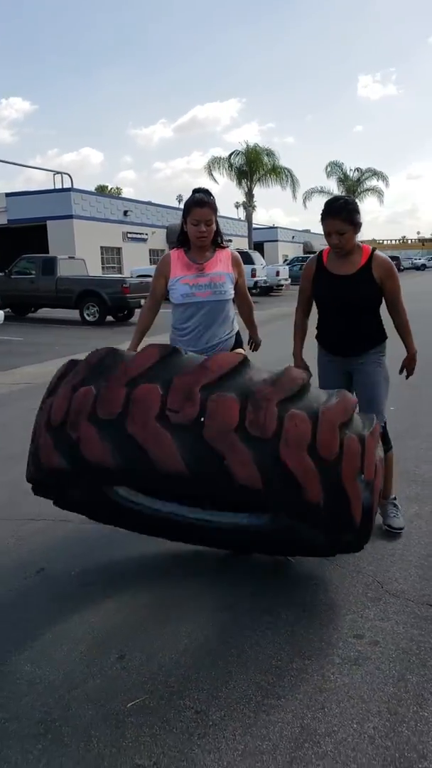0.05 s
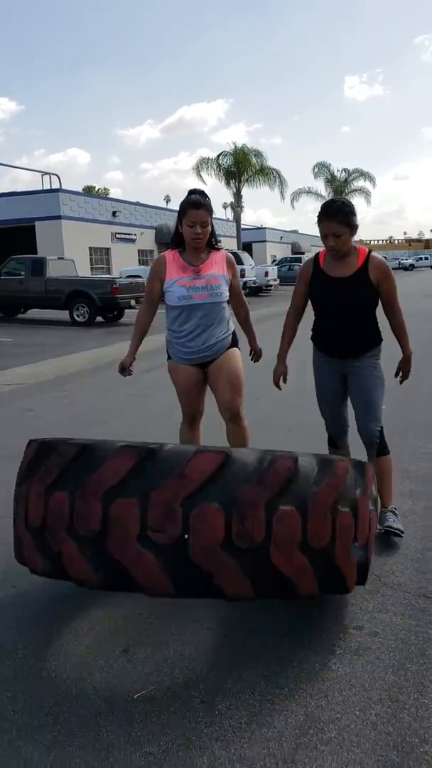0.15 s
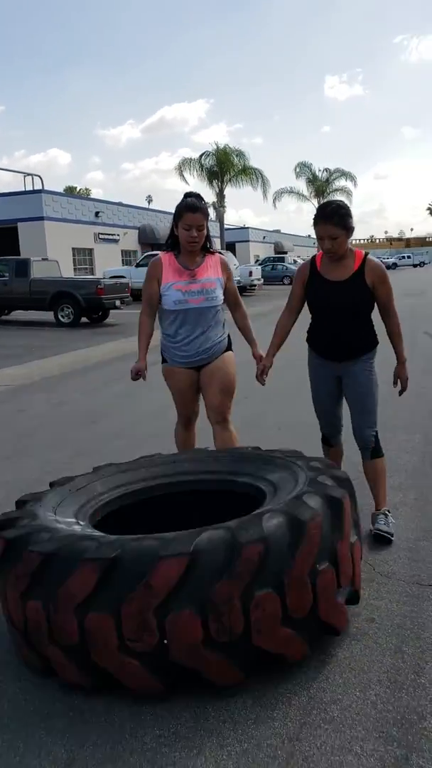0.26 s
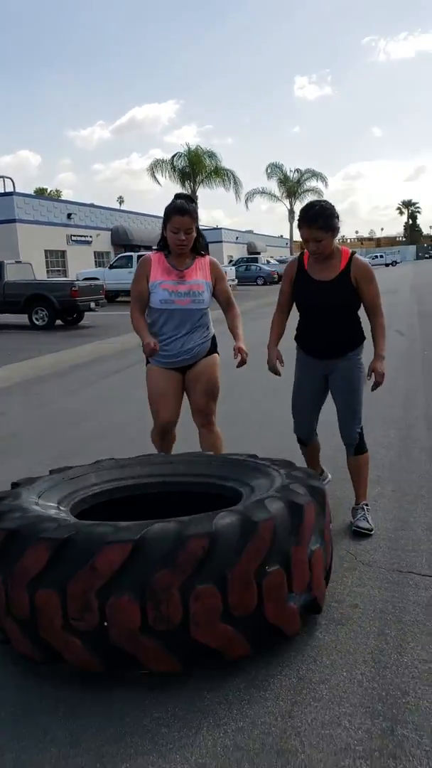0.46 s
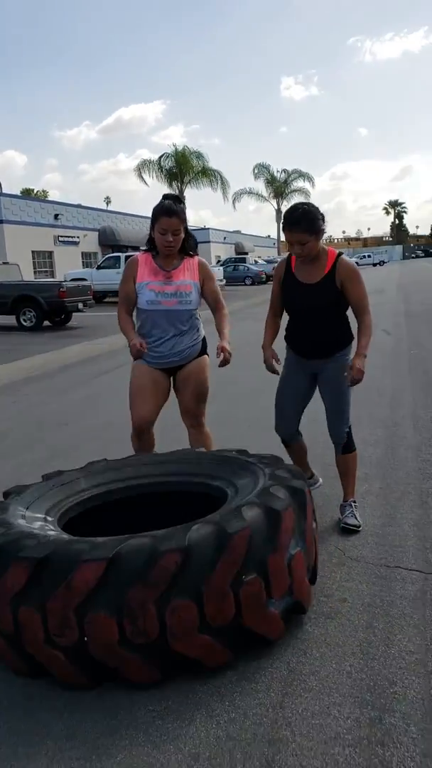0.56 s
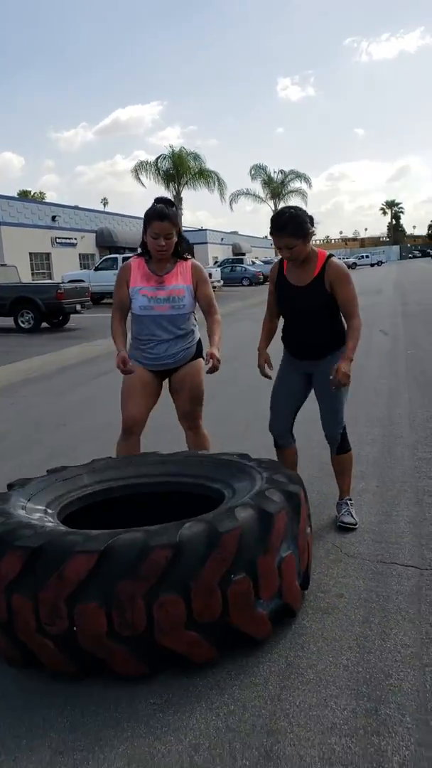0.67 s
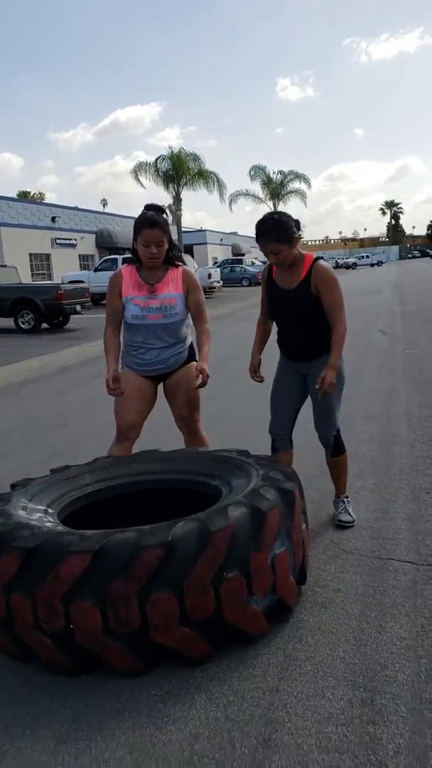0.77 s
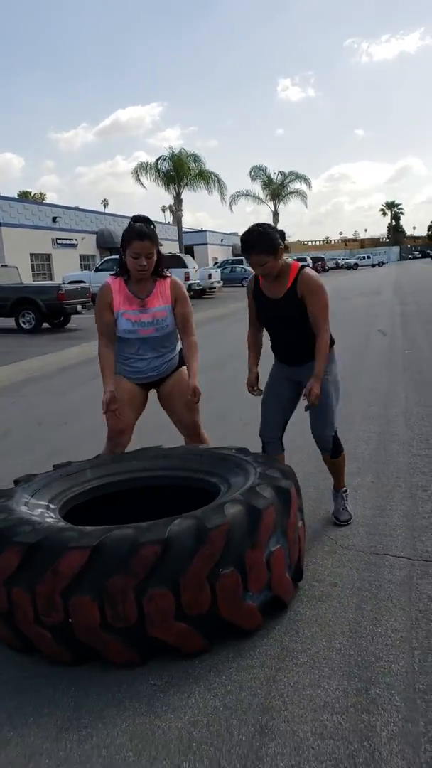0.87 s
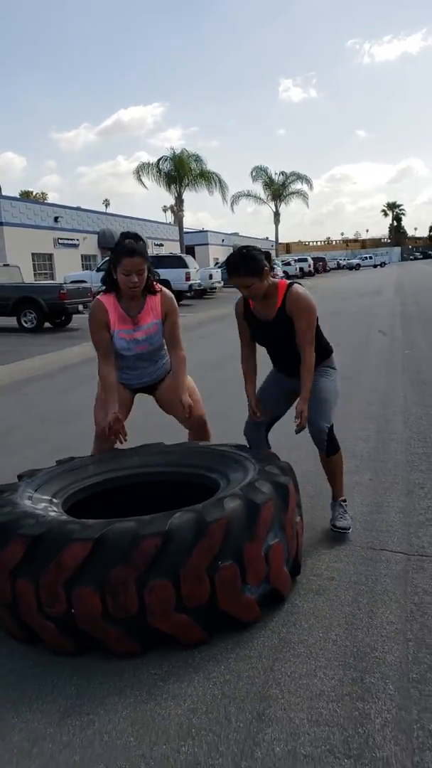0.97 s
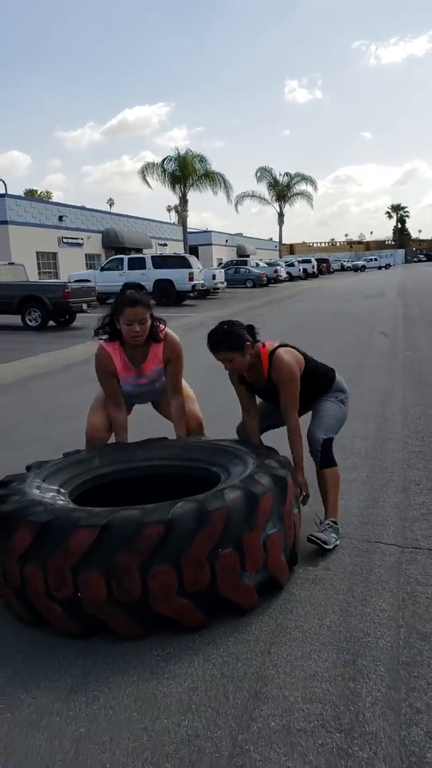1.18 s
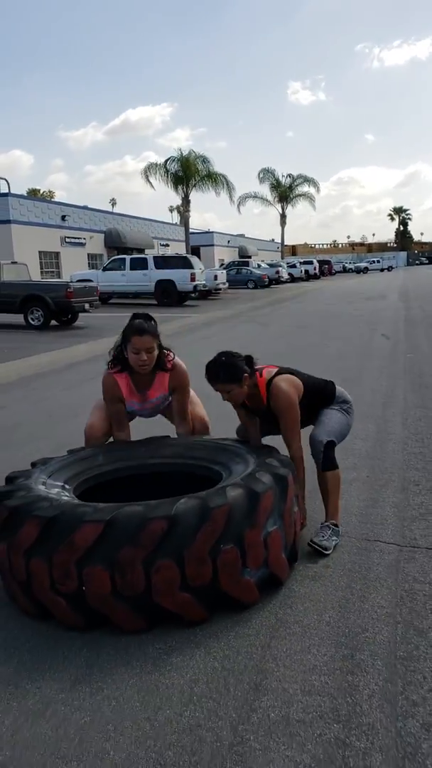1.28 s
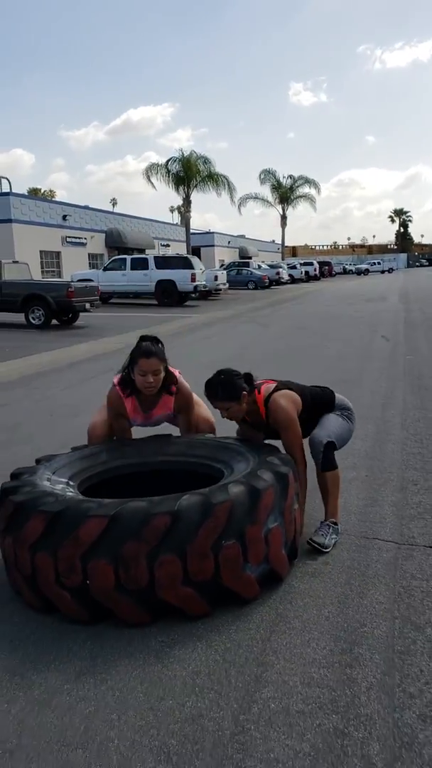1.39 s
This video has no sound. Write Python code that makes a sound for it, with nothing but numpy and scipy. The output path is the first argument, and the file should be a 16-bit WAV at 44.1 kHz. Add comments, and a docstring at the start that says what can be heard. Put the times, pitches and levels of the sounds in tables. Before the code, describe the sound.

A large tire slams onto the pavement of an open lot near the microphone, ringing hollow and echoing briefly off buildings. It wobbles to rest in weaker rubbery thumps, then shoes scuff faintly while far-off traffic hums.

```python
"""An outdoor asphalt lot, with distant traffic humming behind. A tractor tire falls flat: grit sprays,
its tread lugs slap down, the air inside it rings and the buildings answer. The rubber carcass bounces
and settles in deep thuds, then shoes scuff faintly up to it. The traffic is quieter after the blow."""
import sys
import numpy as np
from scipy import signal
from scipy.fft import rfft, irfft, next_fast_len
from scipy.io import wavfile
from scipy.ndimage import map_coordinates

SR = 44100
rng = np.random.default_rng(int(sys.argv[2]) if len(sys.argv) > 2 else 0)


def log_audio(samples):
    """Write samples as a 16-bit WAV file to the path given in sys.argv[1]."""
    # one column per channel
    frames = np.atleast_2d(samples).T
    # limit to full scale, then quantise
    limited = np.clip(frames, -1, 1)
    pcm = np.round(limited * 32767).astype(np.int16)
    wavfile.write(sys.argv[1], SR, pcm)


N = 63945
T = np.arange(N) / SR


def amp(db):
    """Decibels to gain."""
    return 10 ** (np.asarray(db) / 20)


def unit(x):
    """Scale to rms 1."""
    return x / np.sqrt(np.mean(x ** 2) + 1e-20)


def along(points, hz):
    """Read a curve of (Hz, value) points on a log frequency axis."""
    freqs, values = np.transpose(points)
    return np.interp(np.log(hz + 1), np.log(freqs + 1), values)


def filtered(x, response):
    """Shape x with a gain given as a function of Hz."""
    size = next_fast_len(N + SR // 2)
    return irfft(rfft(x, size) * response(np.fft.rfftfreq(size, 1 / SR)), size)[..., :N]


def stereo(pair, eq, correlation):
    """EQ two unrelated signals and mix them as mid and side, at rms 1."""
    angle = lambda hz: np.arccos(np.clip(along(correlation, hz), -1, 1)) / 2
    mid, side = filtered(pair, lambda hz: amp(along(eq, hz)) * [np.cos(angle(hz)), np.sin(angle(hz))])
    return unit(np.array([mid + side, mid - side]))


def noise(eq, correlation):
    """Coloured stereo noise at rms 1."""
    return stereo(rng.standard_normal((2, N)), eq, correlation)


def grains(per_s, spread_db=2.5):
    """Two channels of tiny random impacts of uneven size."""
    hits = rng.random((2, N)) < per_s / SR
    return hits * rng.standard_normal((2, N)) * amp(spread_db * rng.standard_normal(N))


def wobble(per_s):
    """A smooth curve through per_s random points a second."""
    return map_coordinates(rng.standard_normal(int(N * per_s / SR) + 4), [T * per_s])


def since(start):
    """Seconds since start, zero before it."""
    return np.maximum(T - start, 0)


def envelope(start, attack, t60, hold=0):
    """Smooth attack; the exponential decay begins hold seconds after start."""
    return (1 - np.exp(-(since(start) / attack) ** 2)) * amp(-60 * since(start + hold) / t60)


def fader(points):
    """Gain riding through (seconds, dB) points."""
    return amp(np.interp(T, *np.transpose(points)))


def ring(start, modes, attack, hold=0, waver_rad=0):
    """Strike damped (Hz, dB, T60) modes whose phases wander by about waver_rad."""
    return sum(amp(db) * envelope(start, attack, t60, hold)
               * np.sin(2 * np.pi * hz * since(start) + waver_rad * wobble(per_s=45))
               for hz, db, t60 in modes)


def placed(x, balance_db, lag_s=0.00017):
    """Make the left side a touch louder and later than the right."""
    sides = np.array([[.5], [-.5]])
    return filtered(x, lambda hz: amp(balance_db * sides) * np.exp(-2j * np.pi * hz * lag_s * sides))


# Rumble EQ. Each row: frequency in Hz, gain in dB.
RUMBLE_EQ = [(15, -45), (25, -23), (43, -4.5), (75, -2), (93, 0), (160, 0), (204, -4.5), (233, -2.5),
             (253, -4), (340, -6), (410, -10.5), (762, -17.5), (919, -17), (1660, -26), (1950, -26),
             (3930, -27), (7910, -38.5), (11800, -46), (15500, -50)]
# Stereo image of rumble and hiss. Each row: frequency in Hz, left-right correlation.
BED_IMAGE = [(100, 0.99), (400, 0.96), (1000, 0.79), (2500, 0.12), (6000, 0.11), (12000, 0)]
# Engine drone partials. Each row: pitch in Hz, relative level in dB.
DRONE_PARTIALS = [(102.5, -9), (151, -10.5), (231.5, -7), (258, -15), (311, -14.5), (334, -17),
                  (387, -15.5)]
# Fader rides for rumble and drone. Each row: time in seconds, level in dB.
RUMBLE_RIDE = [(0, -35.5), (.2, -34), (.42, -35.5), (.6, -40), (.75, -40.5), (1.0, -40.5), (1.28, -41.5),
               (1.45, -38.5)]
DRONE_RIDE = [(0, -29.5), (.2, -30.5), (.42, -35.5), (.75, -38.5), (1.1, -43.5), (1.45, -40)]
def traffic(lowpass_hz=7480):
    """Distant road rumble and an unsteady engine drone, quieter after the blow."""
    rumble = filtered(noise(RUMBLE_EQ, BED_IMAGE), lambda hz: 1 / (1 + (hz / lowpass_hz) ** 8))
    drone = sum(amp(db) * np.sin(2 * np.pi * hz * T + 0.63 * wobble(per_s=9.22))
                for hz, db in DRONE_PARTIALS)
    return fader(RUMBLE_RIDE) * rumble + fader(DRONE_RIDE) * drone


# Hiss EQ. Each row: frequency in Hz, gain in dB.
HISS_EQ = [(3000, -30), (8500, -11), (10500, 0.5), (12000, 7), (14000, -5), (15500, -3.5)]
# Fader ride for the hiss. Each row: time in seconds, level in dB.
HISS_RIDE = [(0, -58.5), (.22, -56.5), (.4, -63), (.7, -66.5), (.95, -67), (1.05, -62), (1.2, -60),
             (1.45, -58.5)]
def hiss():
    """A faint high hiss that dips after the blow and comes back."""
    return fader(HISS_RIDE) * noise(HISS_EQ, BED_IMAGE)


# Sand sprays. Each row: start in seconds, level in dB, then attack, hold and T60 in seconds.
SPRAYS = [(0.228, -32.5, 0.015, 0.072, 0.1), (0.535, -44.5, 0.03, 0.028, 0.22)]
# EQ of sand and stones. Each row: frequency in Hz, gain in dB.
GRIT_EQ = [(800, 8.5), (2000, -13), (5000, 0.5), (6500, 0), (7800, -16.5), (10000, -4), (12000, 4),
           (15000, -12.5)]
# Single stones. Each row: start in seconds, level in dB.
STONE_TICKS = [(0.299, -30), (0.379, -43), (0.6, -44), (0.606, -37.5)]
def grit():
    """Sand is blown and scraped over the asphalt; a few stones tick."""
    out = np.zeros((2, N))
    for start, db, attack, hold, t60 in SPRAYS:
        sand = stereo(grains(per_s=9000), GRIT_EQ, correlation=[(1000, 0.0055)])
        out += amp(db) * envelope(start, attack, t60, hold) * sand
    for start, db in STONE_TICKS:
        tick = noise(GRIT_EQ, correlation=[(1000, 0)])
        out += amp(db) * envelope(start, attack=0.00037, t60=0.021) * tick
    return out


# Lug hits. Each row: start in seconds, slap level, knock level and echo send in dB,
# centre of the bite (an EQ peak) in Hz, its boost in dB.
LUG_HITS = [(.2395, -23.5, -21.5, -15, 1130, 10), (0.2466, -9.5, -11.5, 0, 4620, 9),
            (.2568, -11.5, -13.5, -16, 2080, 7.5), (0.267, -23, -12.5, -9, 605, 9)]
# EQs of the bright slap and the dull knock. Each row: frequency in Hz, gain in dB.
SLAP_EQ = [(200, -37), (500, 3.5), (800, 1), (1350, 4.5), (1700, -1.5), (2200, -1.5), (2800, -8),
           (3900, -10.5), (5500, -23.5), (7500, -37), (11000, -35), (15000, -32)]
KNOCK_EQ = [(20, -34), (60, -27), (120, 3.5), (220, 4.5), (320, -4), (420, -23), (520, 6), (750, -16.5),
            (1200, -50), (4000, -68)]
# Stereo image of the slap. Each row: frequency in Hz, left-right correlation.
SLAP_IMAGE = [(200, 0.67), (600, 0.34), (1200, 0.19), (2200, -0.67), (4000, -0.29), (8000, -0.35),
              (12000, 0.15)]
def tread(attack_s=0.00044, bite_octaves=0.49):
    """Lugs land in turn, each with a slap and a knock; some slap is thrown at the buildings."""
    slaps, knocks, echo_send = np.zeros((3, 2, N))
    for start, slap_db, knock_db, send_db, bite_hz, bite_db in LUG_HITS:
        bite = lambda hz: amp(bite_db * np.exp(-(np.log2((hz + 1) / bite_hz) / bite_octaves) ** 2))
        bright = unit(filtered(noise(SLAP_EQ, SLAP_IMAGE), bite))
        slap = amp(slap_db) * envelope(start, attack_s, t60=0.048) * bright
        slaps += slap
        echo_send += amp(send_db) * slap
        dull = noise(KNOCK_EQ, correlation=[(300, 0.96), (800, 0.99)])
        knocks += amp(knock_db) * envelope(start, attack_s, t60=0.098) * dull
    return slaps, knocks, echo_send


# Landings on the first edge, the full face and the rebound. Each row: start in seconds, cavity level
# in dB, pitch struck hardest in Hz, hoop level in dB, hoop hold in seconds.
LANDINGS = [(.2412, -16.5, 679, -30.5, 0.076), (.2611, -15, 631, -19, 0.061), (.5453, -33, 565, -42, 0.16)]
# Air modes across the tire's hollow (cavity) and around its ring (hoop).
# Each row: pitch in Hz, relative level in dB, T60 in seconds.
CAVITY_MODES = [(503, 2, .16), (533, -6, .26), (570, -4, .31), (601, 1, .33), (637, -1, .22),
                (656, -2, .48), (706, 2, .17), (722, -14, .52), (744, -4, .2), (798, -12, .33),
                (884, -13, .24), (1007, -14, .55), (1102, -18, .33), (1243, -7, .18), (1387, -12, .24)]
HOOP_MODES = [(183, 0, .3), (183, -14, 1.1), (235, -13, .4)]
# EQ of the wash around the cavity modes. Each row: frequency in Hz, gain in dB.
WASH_EQ = [(350, -30), (480, -8), (590, -4), (700, 0), (800, -28), (1000, -27), (1400, -22), (2200, -43)]
def enclosed_air(strike_width_hz=70, strike_floor=.45, wash_db=-9, attack_s=0.0051):
    """Each landing rings the air inside: a rough cluster across the hollow, a long hum around the ring."""
    cavity, hoop = np.zeros((2, N)), np.zeros(N)
    for start, cavity_db, struck_hz, hoop_db, hold in LANDINGS:
        nearness = lambda hz: np.exp(-((hz - struck_hz) / strike_width_hz) ** 2)
        strike_db = lambda hz: 20 * np.log10(strike_floor + (1 - strike_floor) * nearness(hz))
        modes = [(hz, db + strike_db(hz), t60) for hz, db, t60 in CAVITY_MODES]
        # The flexing walls make the modes waver and blur them into a wash.
        blur = noise(WASH_EQ, correlation=[(600, 0.84)])
        wash = amp(wash_db) * envelope(start, attack_s, t60=0.45) * blur
        cavity += amp(cavity_db) * (ring(start, modes, attack_s, waver_rad=.2) + wash)
        hoop += amp(hoop_db) * ring(start, HOOP_MODES, attack=0.013, hold=hold)
    return cavity, hoop


# Carcass thuds. Each row: start in seconds, level in dB, opening pitch in Hz, attack and T60 in seconds.
THUDS = [(.2478, -11, 86, .006, .12), (.2835, -12, 94, .007, .15), (.3605, -13, 91, .015, .09),
         (.435, -28, 94, .012, .16), (.5368, -11.3, 91, .023, .155), (.668, -30, 95, .012, .14),
         (.7505, -16.5, 93, .011, .17), (.8395, -22, 102, .007, .08), (.8735, -12.5, 92, .012, .14),
         (.968, -34, 92, .008, .14), (1.03, -36, 90, .012, .1)]
def carcass(sag_hz=13, sag_s=.045):
    """Each bounce flexes the rubber: a deep note whose pitch sags as the rubber relaxes."""
    out = np.zeros(N)
    for start, db, hz, attack, t60 in THUDS:
        t = since(start)
        cycles = hz * t - sag_hz * (t - sag_s * (1 - np.exp(-t / sag_s)))
        out -= amp(db) * envelope(start, attack, t60, hold=attack) * np.sin(2 * np.pi * cycles)
    return out


def air_push(start=.2495, hz=49, db=-14, t60=.19):
    """The first landing pushes air out from underneath: one sub-bass pulse."""
    return ring(start, [(hz, db, t60)], attack=.004)


# Building echoes. Each row: delay in seconds, level in dB, low-pass corner in Hz.
WALL_ECHOES = [(.049, -18, 5660), (.083, -10.5, 3780), (.173, -20.5, 4200), (0.258, -26.5, 2500)]
# Decay of the lot's reverb. Each row: frequency in Hz, T60 in seconds.
TAIL_DECAY = [(100, 0.44), (600, 0.61), (2000, 0.38), (5000, 0.49), (12000, 0.17)]
def lot_echoes(slaps, echo_send, highpass_hz=1090, tail_db=-11):
    """Thin, bright slapback from the buildings and a light tail scattered by parked cars."""
    thin = filtered(echo_send[0], lambda hz: hz ** 2 / (hz ** 2 + highpass_hz ** 2))
    walls = lambda hz: sum(amp(db) * np.exp(-2j * np.pi * hz * delay) / (1 + (hz / corner) ** 4)
                           for delay, db, corner in WALL_ECHOES)
    bands, t, spectra = signal.stft(rng.standard_normal((2, SR // 2)), SR, nperseg=256)
    decay = amp(-60 * t / along(TAIL_DECAY, bands)[:, None])
    impulse = signal.istft(spectra * decay, SR, nperseg=256)[1]
    tail = signal.fftconvolve(slaps, impulse / np.linalg.norm(impulse[0]), axes=1)[:, :N]
    return filtered(thin, walls) + amp(tail_db) * tail


# Sidewall bumps. Each row: start in seconds, level in dB.
BUMPS = [(.366, -28), (0.5435, -19.5), (.558, -24.5), (.735, -33), (.887, -35.5)]
# Bump EQ. Each row: frequency in Hz, gain in dB.
BUMP_EQ = [(60, -24), (150, 1), (280, 0.5), (390, -12), (490, -1.5), (650, -6), (850, -21.5), (1300, -26.5),
           (2000, -35), (5000, -58)]
def sidewall():
    """Soft rubbery bumps as the tire drops back after each bounce."""
    return sum(amp(db) * envelope(start, attack=0.0022, t60=0.071)
               * noise(BUMP_EQ, correlation=[(300, 1.0), (1500, 0.99)]) for start, db in BUMPS)


# Sole scuffs. Each row: start in seconds, level in dB, band centre and width in Hz,
# attack and T60 in seconds.
SCUFFS = [(0.895, -55, 3770, 1200, .012, 0.31), (1.002, -44, 1810, 250, .003, 0.075),
          (1.004, -54, 3920, 2000, 0.013, .4), (1.06, -49.5, 3680, 1000, .012, 0.27),
          (1.151, -38.5, 890, 350, 0.0056, 0.075), (1.198, -49.5, 3420, 1200, 0.014, 0.26),
          (1.36, -51.5, 3720, 1000, .008, 0.12), (1.418, -51, 3000, 1400, 0.014, .6)]
def shoes(catch_db=5):
    """Soles stepping up to the tire catch and slip on the asphalt in faint scuffs and squeaks."""
    out = np.zeros((2, N))
    for start, db, centre, width, attack, t60 in SCUFFS:
        rub = filtered(grains(per_s=1500), lambda hz: 1 / (1 + ((hz - centre) / width) ** 2) ** 2)
        stick_slip = amp(catch_db * wobble(per_s=170))
        scuff = stereo(rub * stick_slip, eq=[(1000, 0)], correlation=[(1000, 0.8)])
        out += amp(db) * envelope(start, attack, t60) * scuff
    return out


def scene():
    """The tire lands close ahead, over the traffic bed; only its slaps feed the echoes."""
    slaps, knocks, echo_send = tread()
    cavity, hoop = enclosed_air()
    low_end = carcass() + air_push() + hoop + knocks + sidewall()
    tire = placed(low_end, balance_db=1.25) + placed(cavity, balance_db=1.0) + slaps
    return tire + lot_echoes(slaps, echo_send) + grit() + shoes() + traffic() + hiss()


def record(dry, top_hz=15750):
    """Hard-clip at full scale, then cut everything above top_hz."""
    return filtered(np.clip(dry, -1, 1), lambda hz: hz < top_hz)


dry = scene()
out = record(dry)
log_audio(out)
```